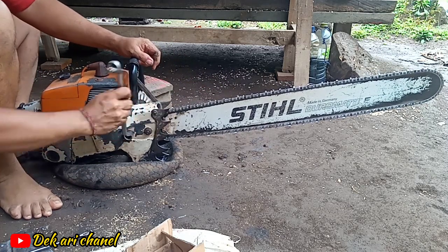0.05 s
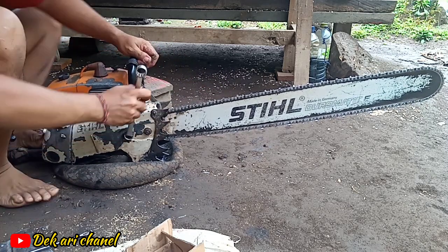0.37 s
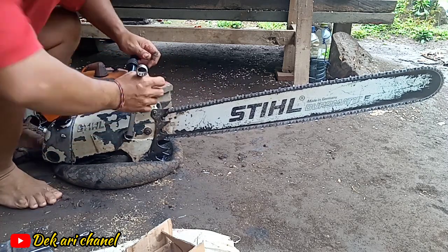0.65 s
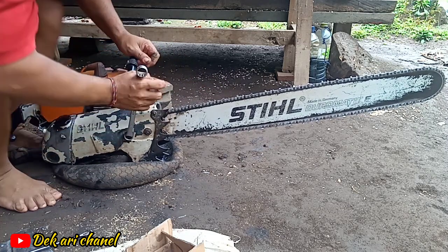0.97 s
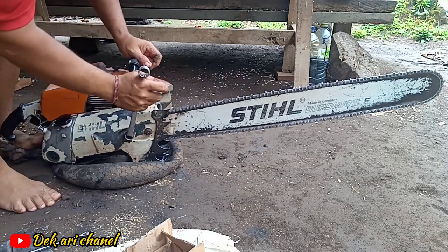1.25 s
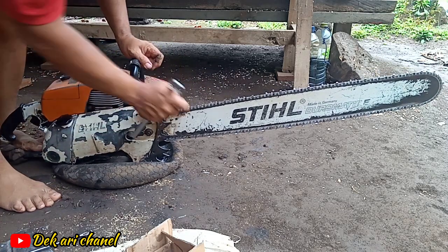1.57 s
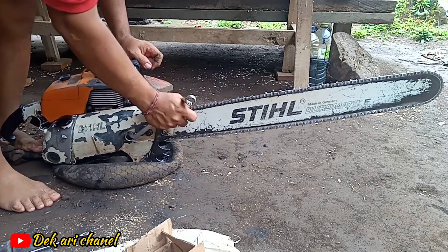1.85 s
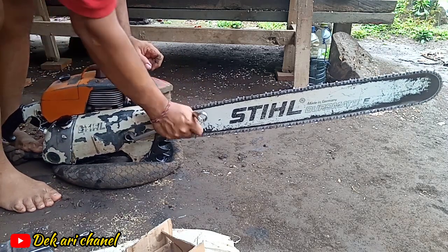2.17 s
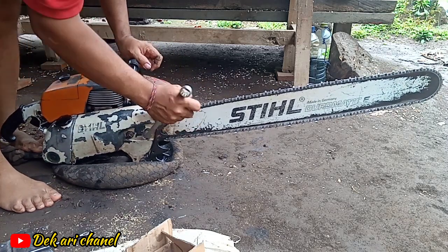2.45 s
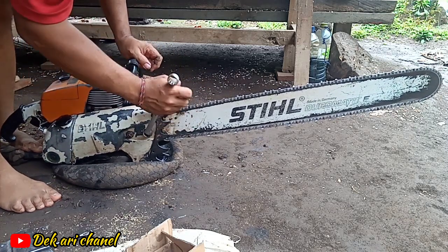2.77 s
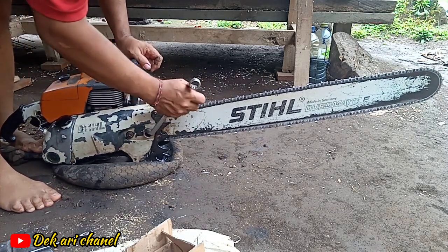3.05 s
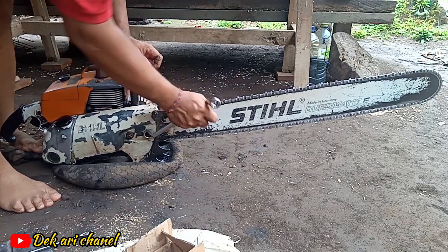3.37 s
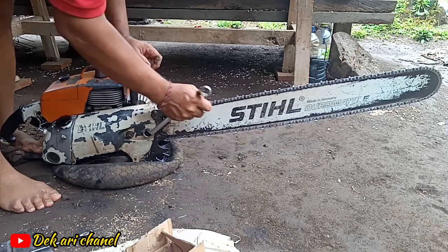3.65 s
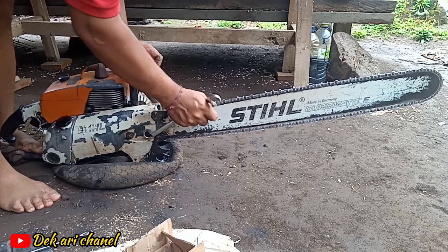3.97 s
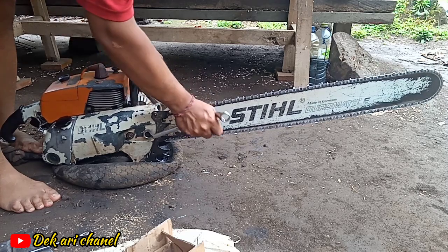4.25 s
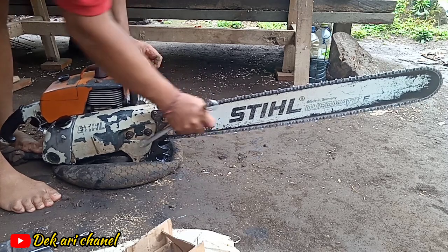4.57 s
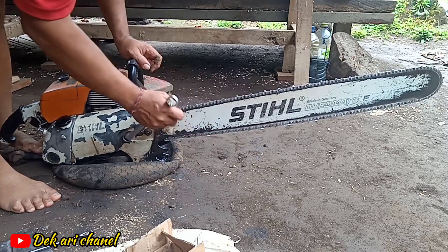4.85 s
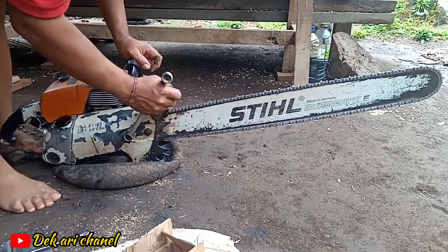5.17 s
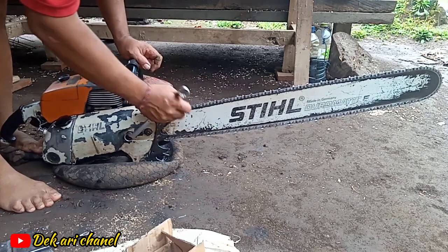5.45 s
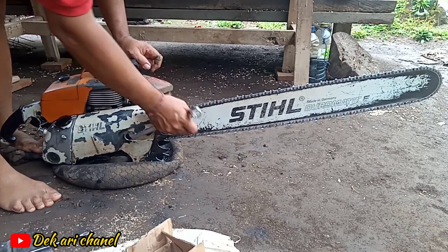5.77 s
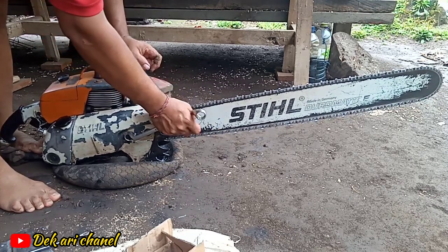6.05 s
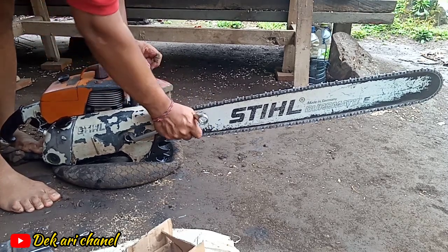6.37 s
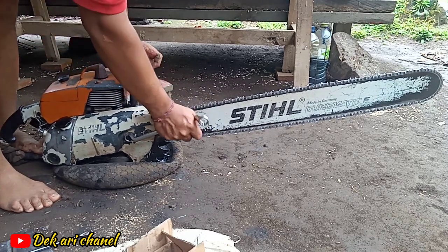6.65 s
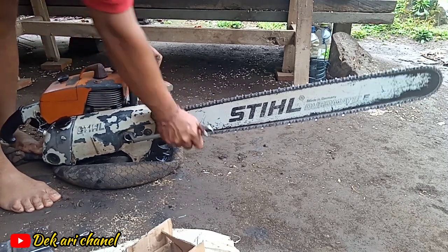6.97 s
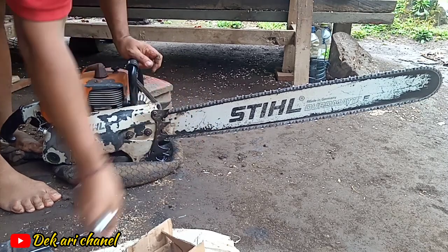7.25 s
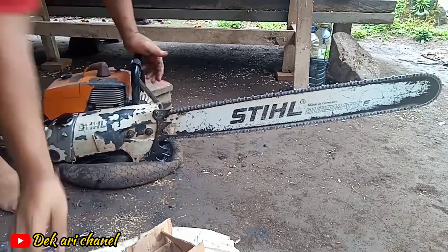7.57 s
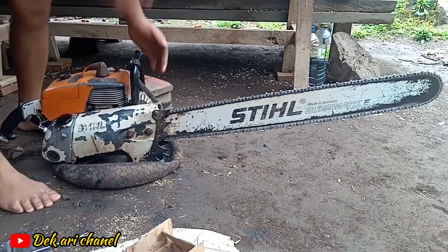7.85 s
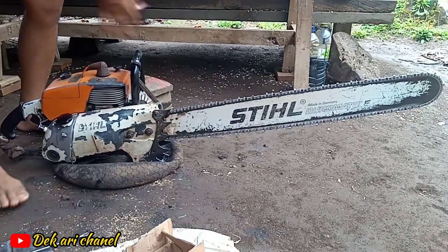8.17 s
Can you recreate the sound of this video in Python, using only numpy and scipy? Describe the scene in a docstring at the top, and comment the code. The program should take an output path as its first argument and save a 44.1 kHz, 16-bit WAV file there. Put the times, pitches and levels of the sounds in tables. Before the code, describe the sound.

Sharp, scattered metal clinks sound near the microphone as a spanner knocks on a switched-off chainsaw, with faint rubbing and soft thuds between them. A distant rooster crows once near the start, and far hammering on wood comes in three short bursts. Finally the spanner lands on the dirt with a bright ring, bounces and settles, and something scuffs. Soft insect hiss and low outdoor air continue underneath.

```python
"""A spanner clinks on the bar and nuts of a stopped chainsaw as it adjusts the chain outdoors.
Each blow of steel on steel cracks, rattles the chain links and leaves a short ring. The spanner is
then tossed down: it rings, bounces and slides to rest on gritty ground, and something scuffs sharply.
Close by there is faint rubbing and the soft thud of shifting weight. Further off somebody hammers on
wood and a rooster crows once, while insects hiss over the low rumble of the quiet yard."""
import sys
import numpy as np
from scipy import signal
from scipy.fft import rfft, irfft
from scipy.io import wavfile

SR = 44100
rng = np.random.default_rng(int(sys.argv[2]) if len(sys.argv) > 2 else 0)


def master(y):
    """Save y as 16-bit WAV."""
    cut = np.clip(np.atleast_2d(y).T, -1, 1)
    pcm = np.round(cut * 32767)  # scale
    wavfile.write(sys.argv[1], SR, pcm.astype(np.int16))


N = 366016

# A fade is the time a sound takes to drop 60 dB. Tilt adds treble; edge lifts only the top treble.
# blows of steel on steel: (time [s], level [dB], tilt [dB per octave], edge [dB])
CLINKS = [(.1735, -32.5, -4, -14), (.1845, -21, 5, -7), (2.6095, -25, 2.3, -19), (2.6785, -27.5, 0, -13),
          (2.982, -49.5, -7, -12), (4.752, -20.5, 1.6, 4.5), (4.8325, -29, 4, -14), (4.876, -38.5, -3.5, 1),
          (4.8825, -32, 0.5, -33), (4.889, -37, 2, -27), (4.954, -36, 1, -53), (5.754, -26, -1, -5),
          (5.7615, -26, 1, -7)]
EVEN_DB, RING_LOSS_DB_PER_DB = -27, 0.3  # blows harder than EVEN_DB have more crack and less ring
# tone colour of a hit on steel: (frequency [Hz], level [dB])
CRACK_COLOUR = [(100, -15), (300, -4), (650, -3.5), (1800, 2.5), (3400, 2.5), (4500, -1), (6200, -4),
                (7300, 3), (8600, 0.5), (9600, -11), (15500, -16)]
# notes at which the struck steel rings: (pitch [Hz], level [dB], fade [s])
STEEL_NOTES = [(622, -2.5, 0.25), (689.4, -2.5, 0.21), (1296, -3.5, 0.18), (1622, -26, 0.075),
               (1970, 4, 0.11), (1970, -14, 0.19), (2430, -7, 0.066), (2740, 2, 0.15), (3135, -6, 0.32),
               (3460, -6.5, 0.24), (3650, -3.5, 0.24), (4090, -10, .08), (5000, -17, 0.046),
               (5670, -15, 0.04), (7030, 5.5, 0.12), (7130, -21, 0.29), (8610, -12, 0.11),
               (10610, -1.5, 0.082), (12200, -34.5, 0.11), (13400, -34, .16)]
# notes of the loose spanner: (pitch [Hz], level [dB], fade before fade_scale shortens it [s])
SPANNER_NOTES = [(322, -54, .8), (818, -39, .85), (1713, -42, 1.25), (2519, -26, .42), (2821, -31, .65),
                 (3698, -29, .4), (4814, -28.5, .62), (5097, -30, .42), (6421, -20, .27), (6522, -38, 2.2),
                 (7073, -24, 1.5), (7278, -29, .7), (7979, -29, .62), (8532, -33, .45), (10782, -33, .42),
                 (11330, -52, .65), (12098, -46, .6), (13320, -48, .45), (13440, -46, .65),
                 (14840, -52, .6)]
# each landing spot favours some notes: (time [s], level [dB], favoured pitch [Hz], spread [Hz])
LANDINGS = [(7.586, 2, 6000, 30000), (7.642, 9, 8460, 260), (7.69, 13.5, 353, 230), (7.722, -1, 4110, 696),
            (7.767, 2.5, 7221, 95), (7.772, -2.5, 14300, 1950)]
# ever weaker bounces of the spanner: (time [s])
BOUNCE_TIMES = [7.669, 7.701, 7.751, 7.771, 7.803, 7.843, 7.907, 7.971, 8.016]
DROP_S, SETTLE_DB_PER_S = 7.586, 54  # when the spanner lands and how fast it calms down
REST_S, REST_FADE_S = 8.0, 3.7  # once it lies flat, the ground muffles it
# dry knocks and scuffs with no ring: (time [s], level [dB], tilt [dB per octave], fade [s])
SCUFFS = [(2.294, -53.5, -4.5, 0.072), (4.5, -66, -5, 0.45), (4.8222, -33, 0, 0.028),
          (4.862, -37.5, -3, 0.032), (4.963, -45, -5, 0.048), (5.744, -46, -6.5, 0.23),
          (5.762, -31.5, -2.5, 0.036), (7.047, -50.5, -6.5, .057), (7.5399, -49.5, -5.5, 0.85),
          (7.566, -39.5, -4.5, 0.25), (7.586, -18, 0.7, 0.013), (7.639, -23, -2, 0.063),
          (8.060, -40.5, -0.5, .055), (8.1124, -28, 0.4, 0.026), (8.1188, -30.5, -1, 0.079)]
# strokes of gritty rubbing: (start [s], length [s], level [dB])
RUB_STROKES = [(0, 0.39, -67.5), (1.037, 0.19, -62), (1.41, 0.56, -72), (3.3, 0.43, -71),
               (5.079, 0.55, -66), (5.547, 0.15, -70), (8.095, 0.09, -55)]
# tone colour of the rubbing: (frequency [Hz], level [dB])
RUB_COLOUR = [(180, -10.5), (300, -32), (492, 3), (808, -11), (985, 1), (2740, 4.5), (5210, -4),
              (6680, 4.5), (9500, -5.5), (15500, -13.5)]
# soft thuds of shifting weight: (time [s], level [dB], pitch [Hz])
THUDS = [(2.11, -63.5, 205.5), (3.059, -65.5, 220), (3.282, -51, 164), (3.392, -52, 180), (3.481, -52, 220),
         (3.544, -49, 119), (7.48, -55, 179)]
# runs of hammering, each on one spot: (tilt [dB per octave], edge [dB], blows as (time [s], level [dB]))
HAMMER_RUNS = [(0.91, 3, [(.151, -45.5), (.338, -46.5), (.507, -43), (.687, -42.5), (.855, -41.5),
               (1.012, -44), (1.137, -47)]), (-0.77, 4.5, [(3.122, -50), (3.296, -40.5), (3.391, -51.5),
               (3.476, -40), (3.632, -43.5)]), (1.2, -4, [(6.494, -64), (6.794, -55), (7.062, -52.5),
               (7.191, -52.5), (7.354, -50.5)])]
# tone colour of a far hammer blow: (frequency [Hz], level [dB])
HAMMER_COLOUR = [(60, -27), (120, -1), (280, -4.5), (480, -2.5), (1100, 0.5), (1500, -1), (2100, -5),
                 (3400, -9), (4500, -16), (5900, -18.5), (7700, -14.5), (9200, -29.5), (15500, -38.5)]
# hollow notes of the hammered wood: (pitch [Hz], width [Hz], level [dB])
WOOD_NOTES = [(272, 8, 8.5), (379, 14.5, -0.5), (576, 50, -6.5), (720, 26, -28), (1024, 26, 0),
              (1250, 85, -10), (1417, 16, -4), (1590, 37, -9.5), (1895, 15, -3), (2615, 100, -7),
              (3326, 49, -2)]
# the course of one crow: (time [s], pitch [Hz], level [dB], wobble [share of the pitch])
CROW = [(.57, 837, -61, .003), (.7, 841, -71, .006), (.85, 897, -64, 0.039), (1.2, 909, -66.5, 0.024),
        (1.429, 812.5, -70.5, 0.058), (1.72, 793, -60, 0.014), (1.971, 780.6, -56, 0.0049),
        (2.02, 743, -70, 0.062), (2.161, 597, -66.5, 0.24)]
# the rooster's throat at 1, 2, 3 and 4 times the pitch: (level [dB])
CROW_HARMONICS = [-3, 3.5, -15.5, -19]
# bands of insect hiss: (pitch [Hz], spread [Hz], level [dB])
INSECTS = [(3540, 490, -80), (7150, 530, -77.5)]
# tone colour of the outdoor rumble: (frequency [Hz], level [dB])
AIR_COLOUR = [(15, -59), (25, -11), (48, -6), (104, 3.5), (255, -10.5), (637, -14), (710, -11.5),
              (769, -15), (1430, -17.5), (2390, -19.5), (3300, -18), (4950, -29), (7030, -28),
              (9460, -33.5), (15800, -36.5)]


def steel_clinks(crack_fade_s=0.037, rattle_fade_s=0.22, rattle_db=-11, notes_db=-10):
    """Steel hits steel: a hard crack, a dense rattle of chain links and a free ring."""
    out, t = np.zeros(N), np.arange(SR // 2) / SR
    usual_hz, db, fade_s = np.transpose(STEEL_NOTES)[:, :, None]
    for start, level_db, tilt_db, edge_db in CLINKS:
        # the grip and the spot that is hit change each note a little at every blow
        strength, detune, phase = rng.standard_normal((3, len(STEEL_NOTES), 1))
        hz = usual_hz * (1 + 0.0045 * detune)
        # the notes are blurred while the parts touch and clearer once they part
        touching = ringing_noise(len(t), hz, 55 + .02 * hz, 2 * strength, floor_db=-10)
        parted = ringing_noise(len(t), hz, 30 + .015 * hz, db / 2 + 2 * strength, floor_db=-10)
        crack = colour(touching, CRACK_COLOUR, tilt_db, edge_db) * fade(t, crack_fade_s)
        rattle = colour(parted, CRACK_COLOUR, tilt_db - 3, edge_db) * fade(t, rattle_fade_s)
        rattle *= gain(1.5 * wander(len(t), per_s=300))
        weights = gain(db + 3 * strength + brightness(hz, tilt_db, edge_db))
        weights /= np.linalg.norm(weights)
        notes = weights * fade(t, fade_s) * np.sin(2 * np.pi * (hz * t + phase))
        ring = gain(rattle_db) * rattle + gain(notes_db) * notes.sum(0)
        ring_db = RING_LOSS_DB_PER_DB * (EVEN_DB - level_db)
        add(out, start, gain(level_db) * (crack + gain(ring_db) * ring) * rise(t, 0.0006))
    return out


def dropped_spanner(chatter_fade_s=2.0, fade_scale=0.86):
    """The dropped tool rings; touches of the ground jog each note until it settles."""
    out, t = np.zeros(N), np.arange(SR) / SR
    for start, level_db, favoured_hz, spread_hz in LANDINGS:
        for hz, db, fade_s in SPANNER_NOTES:
            share = bell_curve(hz, favoured_hz, spread_hz)
            # long notes barely move the steel where it touches, so they feel the ground least
            contact = fade(t, chatter_fade_s) * min(1, .5 / fade_s)
            # a touch can choke a note deeply, but lift it only a little
            flutter_db = np.minimum(3 * contact * wander(len(t), per_s=46.7), 2)
            cycles = hz * t + rng.random() + 0.09 * contact * wander(len(t), per_s=56.5)
            note = np.sin(2 * np.pi * cycles) * fade(t, fade_scale * fade_s) * rise(t, 0.001)
            add(out, start, gain(level_db + db + flutter_db) * share * note)
    return out * fade(np.arange(N) / SR - REST_S, REST_FADE_S)


def scuffs_and_bounces(echo_db=-18, echo_fade_s=0.41, grain_db=2.6):
    """Scuffs and the spanner's bounces crunch briefly; the yard sends back a duller echo."""
    out, t = np.zeros(N), np.arange(SR // 2) / SR
    bounces = [(s, -26 + 20 * np.log10(motion_left(s)), -1.8, 0.067) for s in BOUNCE_TIMES]
    for start, level_db, tilt_db, fade_s in SCUFFS + bounces:
        grit = rng.standard_normal(len(t)) * gain(grain_db * wander(len(t), per_s=860))
        crunch = colour(grit, CRACK_COLOUR, tilt_db, edge_db=2) * fade(t, fade_s)
        echo = colour(rng.standard_normal(len(t)), CRACK_COLOUR, tilt_db - 0.5) * fade(t, echo_fade_s)
        add(out, start, gain(level_db) * (crunch + gain(echo_db) * echo) * rise(t, 0.0001))
    return out


def motion_left(time_s):
    """The share of its motion that the spanner still has after landing."""
    return gain(-SETTLE_DB_PER_S * np.maximum(time_s - DROP_S, 0)) * (time_s >= DROP_S)


def rubbing(rise_s=0.019, fade_s=0.76, slide_db=-37.5):
    """Fine, uneven friction: strokes set in, hold and fade, and the tossed tool slides to rest."""
    t = np.arange(N) / SR
    strokes = sum(gain(db) * np.clip((t - start) / rise_s, 0, 1) * fade(t - start - length, fade_s)
                  for start, length, db in RUB_STROKES)
    grit = rng.standard_normal(N) * gain(wander(N, per_s=360))
    slide = colour(grit, RUB_COLOUR, edge_db=-11) * gain(slide_db) * motion_left(t)
    return colour(grit, RUB_COLOUR) * strokes + slide


def thuds(swell_s=0.025):
    """Shifting weight gives the ground dull, soft pushes."""
    out, t = np.zeros(N), np.arange(SR // 3) / SR
    push = t / swell_s * np.exp(1 - t / swell_s)
    for start, level_db, hz in THUDS:
        add(out, start, gain(level_db) * noise_band(len(t), hz, 0.32 * hz) * push)
    return out


def far_hammering(hold_s=0.026, tail_db=-21):
    """Far blows on wood arrive as a tight bunch of echoes, then die away."""
    out, t = np.zeros(N), np.arange(SR // 2) / SR
    hz, width_hz, db = np.transpose(WOOD_NOTES)[:, :, None]
    bunch = fade(t - hold_s, 0.39) * fade(t, 0.5)
    loudness = (bunch + gain(tail_db) * fade(t, 1.0)) * rise(t, 0.00068)
    for tilt_db, edge_db, blows in HAMMER_RUNS:
        for start, level_db in blows:
            echoes = ringing_noise(len(t), hz, width_hz, db, floor_db=-3)
            echoes *= gain(1.2 * wander(len(t), per_s=400))
            add(out, start, gain(level_db) * loudness * colour(echoes, HAMMER_COLOUR, tilt_db, edge_db))
    return out


def rooster(echo_fade_s=0.37, echo_db=-4):
    """A long, far crow, hoarse in the middle and at its falling end, blurred by the trees."""
    times, *columns = np.transpose(CROW)
    crow, t = np.zeros(N), np.arange(times[0], times[-1], 1 / SR)
    hz, db, wobble = (np.interp(t, times, column) for column in columns)
    cycles = np.cumsum(hz * (1 + wobble * wander(len(t), per_s=350))) / SR
    voice = sum(gain(level) * np.sin(2 * np.pi * k * cycles) for k, level in enumerate(CROW_HARMONICS, 1))
    add(crow, times[0], unit_level(voice) * gain(db))
    trees = rng.standard_normal(SR // 2) * fade(np.arange(SR // 2) / SR, echo_fade_s)
    echo = signal.fftconvolve(crow, trees / np.linalg.norm(trees))[:N]
    return 0.81 * crow + gain(echo_db) * echo


def air_and_insects(air_db=-65, drift_db=2.0, swell_db=3.0, chirr_db=1.2):
    """A low outdoor rumble, and two bands of insects that flutter quickly and swell slowly."""
    out = colour(rng.standard_normal(N), AIR_COLOUR) * gain(air_db + drift_db * wander(N, per_s=27))
    for hz, spread_hz, db in INSECTS:
        hiss = noise_band(N, hz, spread_hz)
        out += hiss * gain(db + swell_db * wander(N, per_s=4.1) + chirr_db * wander(N, per_s=41))
    return out


def gain(db):
    """Turns decibels into a number to multiply by."""
    return 10 ** (np.asarray(db) / 20)


def unit_level(sound):
    """Scales a sound to an average level of 1."""
    return sound / np.sqrt(np.mean(sound ** 2) + 1e-20)


def add(mix, start_s, sound):
    """Mixes a sound in at a given time."""
    part = mix[round(start_s * SR):][:len(sound)]
    part += sound[:len(part)]


def rise(t, rise_s):
    """Climbs smoothly from 0 towards 1."""
    return 1 - np.exp(-t / rise_s)


def fade(t, fade_s):
    """Full until t = 0, then 60 dB quieter every fade_s."""
    return np.exp(-np.log(1000) * np.maximum(t, 0) / fade_s)


def wander(size, per_s):
    """A curve that glides to a new random value per_s times a second."""
    return unit_level(np.interp(np.arange(size) * per_s / SR, np.arange(4096), rng.standard_normal(4096)))


def bell_curve(hz, centre_hz, spread_hz):
    """1 at the centre, falling smoothly on both sides."""
    return np.exp(-.5 * ((hz - centre_hz) / spread_hz) ** 2)


def brightness(hz, tilt_db, edge_db):
    """Harder, sharper hits put more into the treble; gives the change in dB."""
    return tilt_db * np.log2(np.clip(hz, 300, 9000)) + edge_db / (1 + (8500 / hz) ** 6)


def colour(sound, table, tilt_db=0, edge_db=0):
    """Shapes a sound's bass and treble by a colour table, at level 1."""
    hz = np.fft.rfftfreq(len(sound), 1 / SR) + 1
    table_hz, table_db = np.transpose(table)
    db = np.interp(np.log(hz), np.log(table_hz), table_db) + brightness(hz, tilt_db, edge_db)
    return unit_level(irfft(rfft(sound) * gain(db), len(sound)))


def noise_band(size, hz, spread_hz):
    """Noise gathered around one pitch."""
    band = bell_curve(np.fft.rfftfreq(size, 1 / SR), hz, spread_hz)
    return unit_level(irfft(rfft(rng.standard_normal(size)) * band, size))


def ringing_noise(size, hz, width_hz, db, floor_db):
    """A burst of tiny hits, loudest near an object's own notes."""
    peaks = (gain(db) * bell_curve(np.fft.rfftfreq(size, 1 / SR), hz, width_hz)).max(0)
    return irfft(rfft(rng.standard_normal(size)) * (gain(floor_db) + peaks), size)


def scene():
    """All sources add up in one channel."""
    tool = steel_clinks() + scuffs_and_bounces() + dropped_spanner()
    return (tool + far_hammering() + thuds() + rooster() + rubbing() + air_and_insects())[None]


def record(dry, low_cut_hz=55, high_cut_hz=15900):
    """The microphone loses the deepest bass, and the very top treble is cut off."""
    bass_cut = signal.butter(2, low_cut_hz, "highpass", fs=SR, output="sos")
    treble_cut = signal.firwin(511, high_cut_hz, window=("kaiser", 9), fs=SR)
    return signal.oaconvolve(signal.sosfilt(bass_cut, dry), treble_cut[None], "same")


dry = scene()
out = record(dry)
master(out)
```